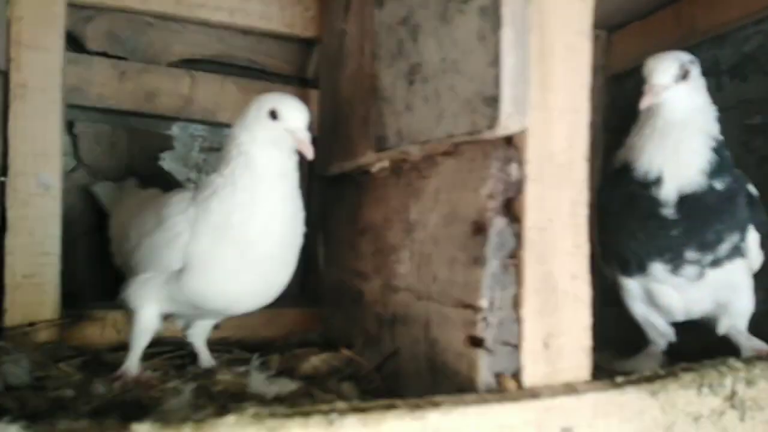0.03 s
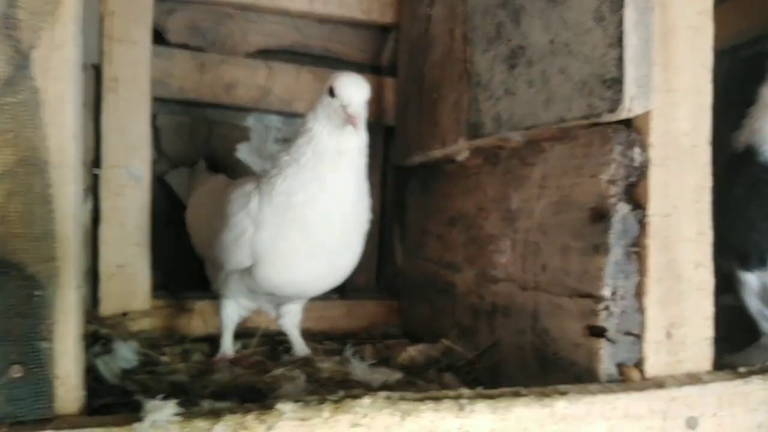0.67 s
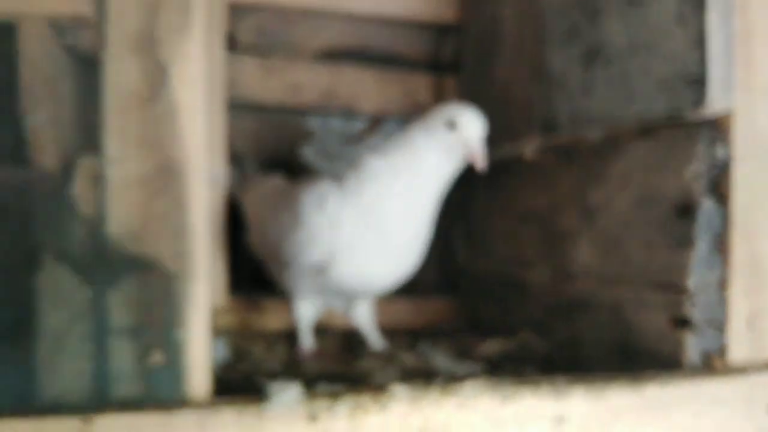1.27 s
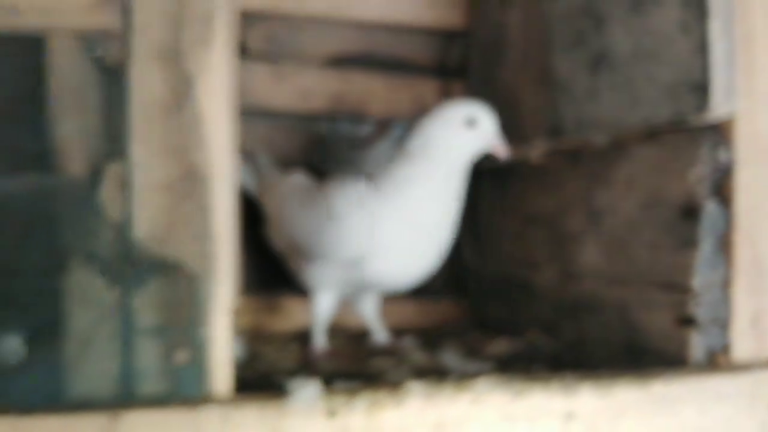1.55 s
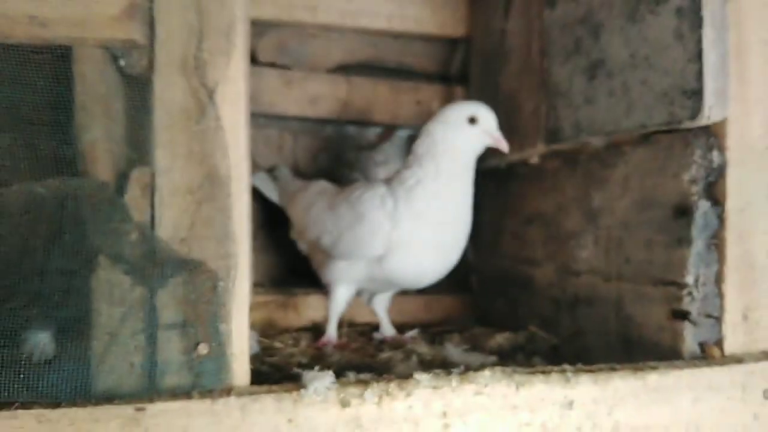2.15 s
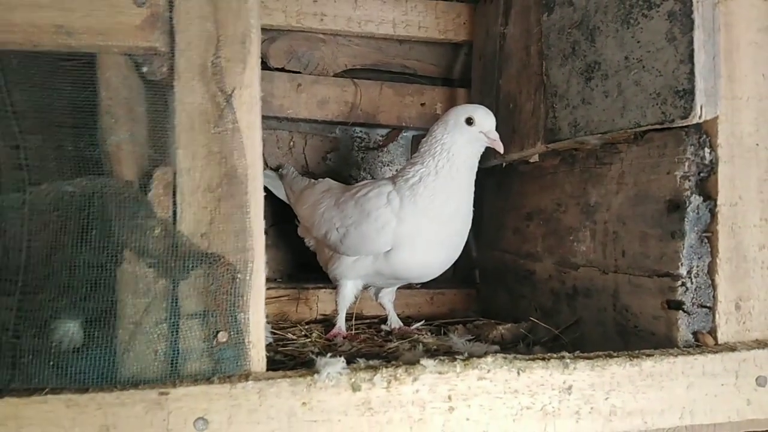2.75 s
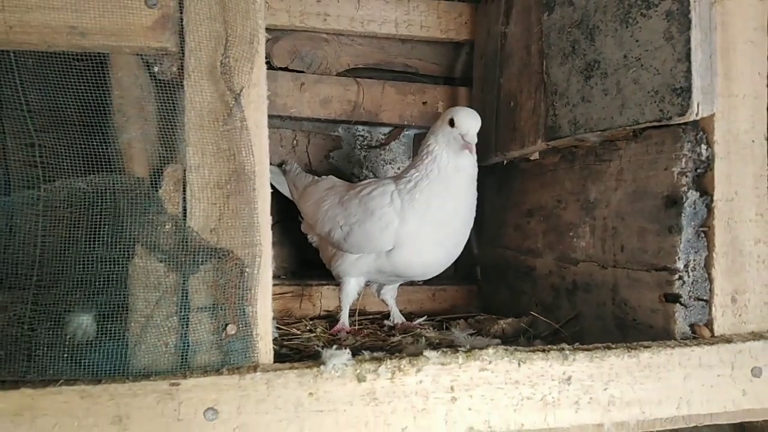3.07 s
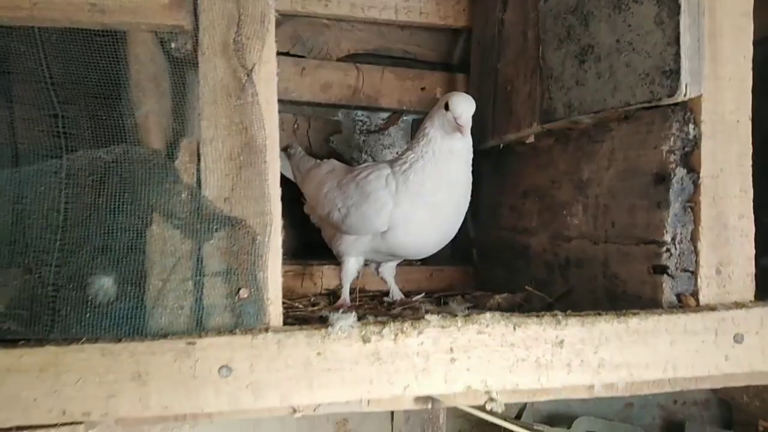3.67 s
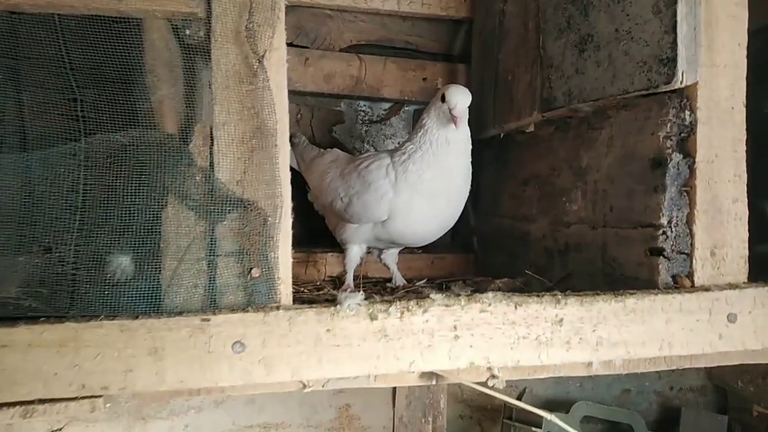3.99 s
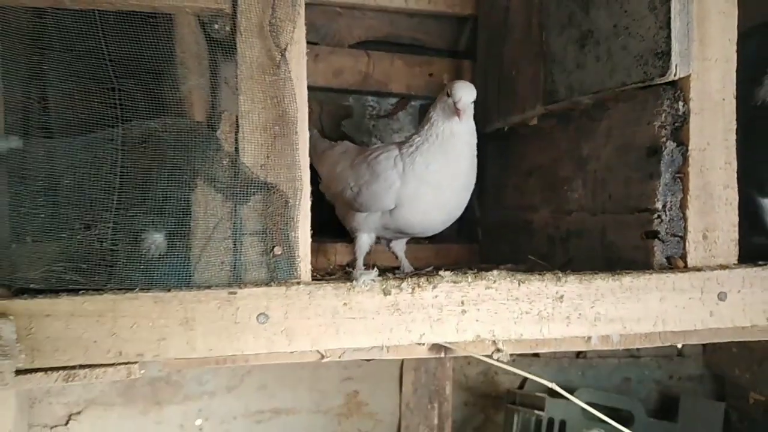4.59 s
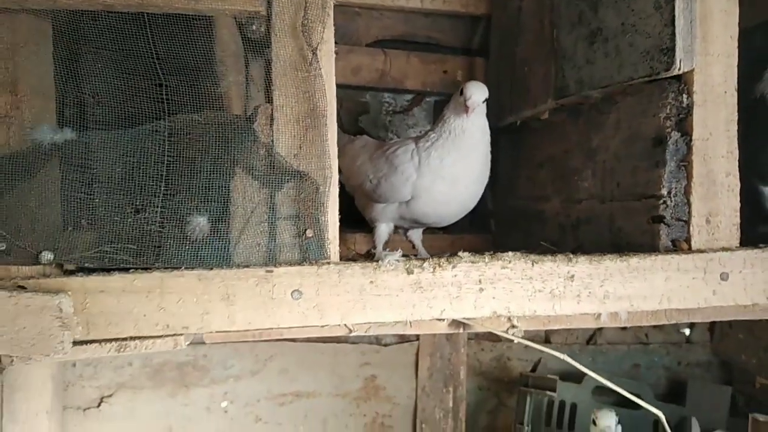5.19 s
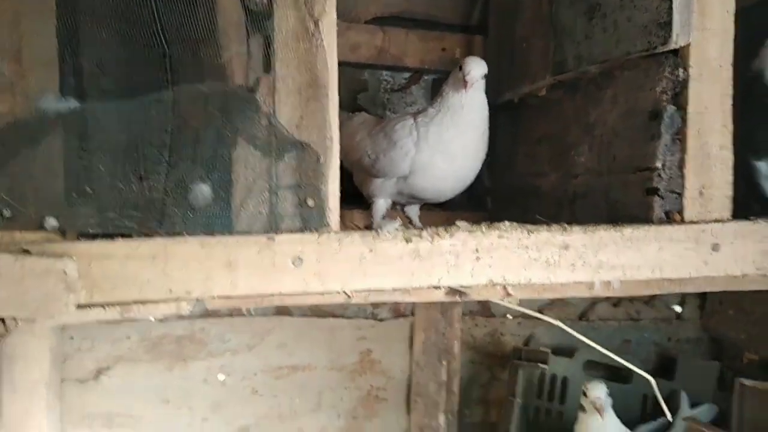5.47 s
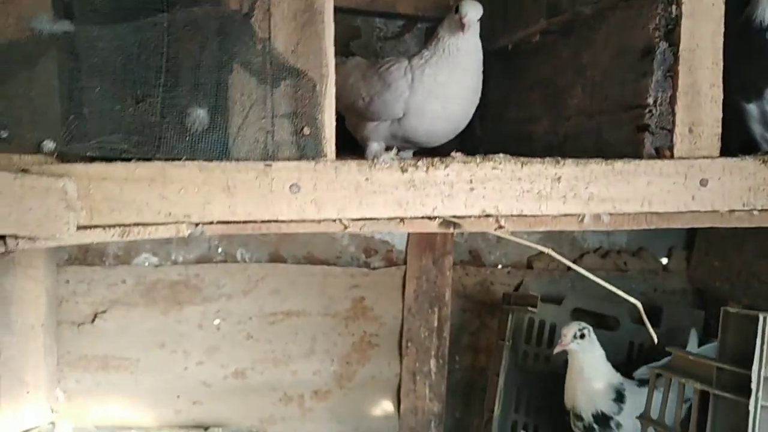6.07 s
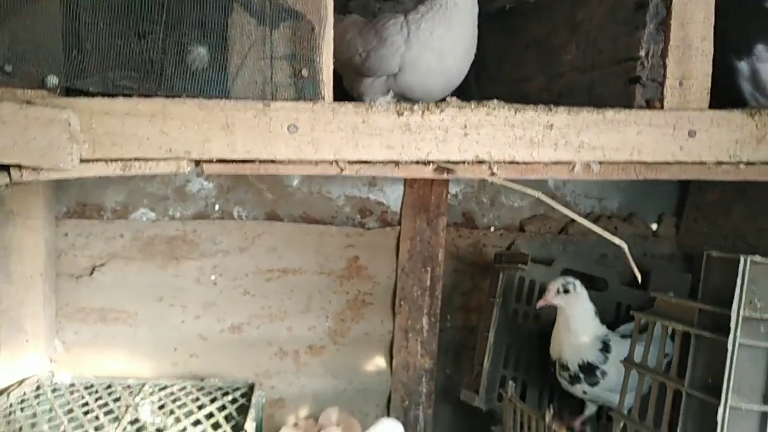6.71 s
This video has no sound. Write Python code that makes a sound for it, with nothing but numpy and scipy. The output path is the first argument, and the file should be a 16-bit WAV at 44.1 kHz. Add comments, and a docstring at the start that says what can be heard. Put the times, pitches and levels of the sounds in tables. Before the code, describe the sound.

Dry straw crunches and feathers rustle as pigeons move around nearby in a wooden loft. Soft knocks, scuffs and a low rumble come from the boards, mixed with sharp little clicks of breaking stalks. After a busy opening there is a brief lull, then one clearer knock and scattered shuffling. The sound is close and boxy, brighter on the left, over a faint steady hiss.

```python
"""Dry litter and feathers rustle over scuffing, rumbling boards: pigeons shuffle in wooden nest boxes.
They are close by and never call, and a faint hiss lies under everything. Soft blows set the boards
ringing, feet crunch the litter, and stalks snap as they break or squeak as they stick and slip.
The rubbing sounds are made of countless tiny slips. The small boxes add a very short echo to the
knocks and snaps, and the treble is stronger on the left."""
import sys
import numpy as np
from scipy import signal
from scipy.fft import rfft, irfft, next_fast_len
from scipy.io import wavfile
from scipy.ndimage import uniform_filter1d

SR = 44100
rng = np.random.default_rng(int(sys.argv[2]) if len(sys.argv) > 2 else 0)


def wav_record(signal):
    """Record a signal, one row per channel, as 16-bit PCM in the file named by sys.argv[1]."""
    frames = np.transpose(np.atleast_2d(signal))
    bounded = np.clip(frames, -1, 1)
    # unit amplitude maps onto the largest positive 16-bit level
    quanta = np.round(bounded * 32767).astype(np.int16)
    wavfile.write(sys.argv[1], SR, quanta)


N = 301933
TIME = np.arange(N) / SR
FFT_SIZE = next_fast_len(N + SR // 2)
FREQS = np.arange(FFT_SIZE // 2 + 1) * SR / FFT_SIZE


def from_db(db):
    """Turn decibels into a number to multiply by."""
    return 10 ** (np.asarray(db) / 20)


def rms_one(x):
    """Scale a signal so that its average power is 1."""
    return x / np.sqrt(np.mean(x ** 2) + 1e-20)


def over_hz(points):
    """Join a table's points into a curve over all frequencies."""
    hz, value = np.transpose(points)
    return np.interp(np.log(np.maximum(FREQS, 1)), np.log(hz), value)


def colour(x, spectrum):
    """Give a sound a tone colour, with a filter that never rings ahead of it (minimum phase)."""
    cepstrum = irfft(np.log(from_db(over_hz(spectrum))), FFT_SIZE)
    cepstrum[1:FFT_SIZE // 2] *= 2
    cepstrum[FFT_SIZE // 2 + 1:] = 0
    return irfft(rfft(x, FFT_SIZE) * np.exp(rfft(cepstrum)), FFT_SIZE)[..., :N]


def linger(power, lag_s):
    """Make a strength build up and die away a little late."""
    keep = np.exp(-1 / (lag_s * SR))
    return signal.lfilter([1 - keep], [1, -keep], power + 1e-18)


def at_mics(pair):
    """Long waves reach both microphones alike; short ones arrive unrelated."""
    # Each row: frequency in Hz, how alike left and right are (1 means the same).
    likeness = [(100, .98), (300, .88), (600, .62), (1000, .05), (1500, -.25), (3000, -.1), (6000, 0)]
    alike = np.clip(over_hz(likeness), -.99, .99)
    first, second = rfft(pair, FFT_SIZE)
    mid, side = np.sqrt(1 + alike) * first, np.sqrt(1 - alike) * second
    return irfft([mid + side, mid - side], FFT_SIZE)[:, :N]


def drift(rate_hz):
    """A smooth random wander, mostly slower than the given rate."""
    slow = irfft(rfft(rng.standard_normal(FFT_SIZE)) / (1 + (FREQS / rate_hz) ** 2), FFT_SIZE)
    return rms_one(slow[:N])


def patches(shape, bins, frames):
    """Smooth random patches, some bins wide in pitch and some frames long in time."""
    field = uniform_filter1d(rng.standard_normal(shape), bins, axis=0)
    return rms_one(uniform_filter1d(field, frames, axis=1))


def shifting_colour(x, ring_db, tint_db):
    """New stalks and feathers keep taking over, each with its own narrow rings and broad tint."""
    spectra = signal.stft(x, nperseg=512)[2]
    rings = patches(spectra.shape[1:], bins=2, frames=9)
    tint = patches(spectra.shape[1:], bins=16, frames=4)
    return signal.istft(spectra * from_db(ring_db * rings + tint_db * tint))[1][:, :N]


def friction(spectrum, slips_per_s, uneven_db, clump_db, clump_hz, smooth, ring_db, tint_db):
    """Rubbing: countless tiny slips of uneven size come in clumps over a smooth hiss."""
    slipping = rng.random(N) < slips_per_s / SR
    sizes = from_db(uneven_db * np.minimum(rng.exponential(1, N), 4))
    clumps = from_db(clump_db * np.clip(drift(clump_hz), -2, 2))
    force = np.sqrt(rms_one(slipping * sizes) ** 2 + smooth ** 2) * clumps
    slips = shifting_colour(force * rng.standard_normal((2, N)), ring_db, tint_db)
    sound = colour(at_mics(slips), spectrum)
    return sound / np.std(sound.mean(axis=0))


def strokes(rows, skew):
    """Movements swell and fade, peaking early if skew is under 1; one power curve per level column."""
    power = np.zeros((len(rows[0]) - 2, N))
    for start, length, *levels in rows:
        during = (TIME > start) & (TIME < start + length)
        arch = np.sin(np.pi * ((TIME[during] - start) / length) ** skew)
        power[:, during] += np.outer(from_db(levels), arch) ** 2
    return power


def stirring_db(times):
    """How much the birds stir at the given times."""
    # The faint, unbroken rustle. Each row: time in seconds, level in dB.
    stir = [(0, -41.5), (0.5, -47), (1.15, -45), (1.6, -49.5), (1.81, -54.5), (2.0, -47), (2.22, -57.5),
            (2.39, -64), (2.66, -68), (2.84, -52), (3.05, -48.5), (3.6, -48), (4.12, -51), (4.7, -46.5),
            (5.06, -52), (5.39, -56.5), (5.62, -46), (6.17, -54.5), (6.85, -53)]
    return np.interp(times, *np.transpose(stir))


def rustles():
    """A bird shifts its body and its feathers brush the litter, with crisp grains on top."""
    # Each row: start in seconds, length in seconds, level in dB.
    body_shifts = [(0.07, 0.12, -36), (0.197, 0.11, -32), (0.31, 0.18, -34.5), (0.645, 0.4, -36),
                   (1.19, 0.12, -44.5), (1.395, 0.12, -38.5), (1.87, 0.068, -46.5), (2.97, 0.19, -43),
                   (3.15, 0.21, -38.5), (3.49, 0.2, -44.5), (3.86, 0.11, -45.5), (4.15, 0.06, -50),
                   (4.36, 0.35, -39.5), (4.785, 0.25, -41), (5.13, 0.11, -45), (5.84, 0.065, -40.5),
                   (6.07, 0.066, -41.5), (6.28, 0.11, -46.5), (6.69, 0.29, -55)]
    # Tone colours of the rustle and the grains. Each row: frequency in Hz, relative level in dB.
    rustle_tone = [(300, -45), (1000, -15.5), (1800, -14), (2500, -9.5), (3700, -14), (5000, -9),
                   (6300, -3.5), (7400, 0.5), (8400, -4.5), (9500, -8.5), (11000, -15), (12600, -19.5),
                   (14500, -27.5)]
    grain_tone = [(500, -34), (2500, -27), (4000, -15.5), (6300, -2), (7400, 0.5), (9500, -7.5),
                  (11500, -16.5), (14500, -24)]
    brushing, = strokes(body_shifts, skew=0.57)
    rustle_gain = np.sqrt(brushing + from_db(stirring_db(TIME)) ** 2)
    grain_gain = from_db(-3.5) * np.sqrt(brushing)
    rustle = friction(rustle_tone, slips_per_s=3000, uneven_db=1.5, clump_db=2.0, clump_hz=26,
                      smooth=1.0, ring_db=3.5, tint_db=1.7)
    grains = friction(grain_tone, slips_per_s=1500, uneven_db=3.5, clump_db=2.0, clump_hz=80,
                      smooth=0.54, ring_db=4.5, tint_db=2.5)
    return rustle_gain * rustle + grain_gain * grains


def scuffs():
    """Feet drag over the boards, and the shelf under them rumbles just after."""
    # Each row: start in seconds, length in seconds, scuff level in dB, rumble level in dB.
    drags = [(0, 0.14, -47.5, -51), (0.2, 0.15, -45.5, -42.5), (0.34, 0.22, -54, -40.5),
             (0.66, 0.16, -45.5, -49), (0.82, 0.27, -48.5, -43.5), (1.385, 0.14, -42, -43.5),
             (1.52, 0.073, -50, -46.5), (1.77, 0.21, -52.5, -52), (2.51, 0.15, -76, -59),
             (2.69, 0.12, -54, -65), (3.26, 0.25, -50, -45.5), (3.74, 0.23, -48, -48),
             (3.96, 0.14, -57.5, -51), (4.39, 0.34, -56.5, -56), (4.73, 0.14, -58, -48.5),
             (4.91, 0.1, -60, -53), (5.105, 0.18, -50, -51), (5.838, 0.25, -42.5, -49),
             (6.245, 0.3, -43.5, -45.5), (6.805, 0.19, -46, -52)]
    # Dull shuffling between the drags. Each row: time in seconds, level in dB.
    shuffle = [(0, -51), (0.55, -54), (1.15, -55), (1.6, -58), (1.95, -62.5), (2.25, -68), (2.4, -86),
               (2.66, -88), (2.78, -69), (2.98, -72.5), (3.45, -56.5), (3.65, -68.5), (4.0, -60),
               (4.21, -67.5), (4.65, -56), (5.02, -81), (5.35, -59), (5.65, -70), (6.12, -54),
               (6.85, -59.5)]
    # Tone colours of the boards and the shelf. Each row: frequency in Hz, relative level in dB.
    scuff_tone = [(100, -15.5), (200, -3), (290, -2), (400, -2), (580, -2.5), (800, -7), (1200, -12.5),
                  (2100, -9), (3200, -17), (8000, -39)]
    rumble_tone = [(20, -58), (40, -36), (60, -1.5), (90, 3), (125, 1), (190, -4), (260, -23.5),
                   (500, -34.5), (2000, -35)]
    shuffle_db = np.interp(TIME, *np.transpose(shuffle))
    idle_rumble_db = -56.5 + 0.26 * (shuffle_db - shuffle_db.mean())
    dragging, shaking = strokes(drags, skew=0.59)
    scuff_gain = np.sqrt(dragging + from_db(shuffle_db) ** 2)
    rumble_gain = np.sqrt(linger(shaking, lag_s=0.018) + from_db(idle_rumble_db) ** 2)
    scuff = friction(scuff_tone, slips_per_s=900, uneven_db=2.0, clump_db=2.0, clump_hz=16,
                     smooth=1.0, ring_db=3.5, tint_db=-0.27)
    rumble = friction(rumble_tone, slips_per_s=510, uneven_db=3.5, clump_db=0.0, clump_hz=25,
                      smooth=1.0, ring_db=1.5, tint_db=0.13)
    return scuff_gain * scuff + rumble_gain * rumble


def hiss(level_db):
    """A steady high hiss lies under everything."""
    # Each row: frequency in Hz, relative level in dB.
    hiss_tone = [(300, -40), (1000, -34), (2500, -20.5), (4000, -15.5), (7200, -0.5), (9500, -10),
                 (12000, -19), (14500, -23)]
    noise = colour(at_mics(rng.standard_normal((2, N))), hiss_tone)
    return from_db(level_db) * noise / np.std(noise.mean(axis=0))


def ring(clicks, hz, fade_s):
    """Each click starts a pure tone that falls by 60 dB in fade_s seconds."""
    decay, turn = from_db(-60 / (fade_s * SR)), 2 * np.pi * hz / SR
    return signal.lfilter([0, np.sin(turn)], [1, -2 * decay * np.cos(turn), decay ** 2], clicks + 1e-18)


def knocks(board_db, thump_db, contact_s, spread_db, focus_db):
    """A soft blow rings the board, most near the pitch the struck spot favours, and shakes the shelf."""
    # Each row: time in seconds, relative knock and thump levels in dB, favoured pitch in Hz.
    blows = [(0.108, -30.5, -59, 750), (0.142, -27, -35, 720), (0.294, -30.5, -46, 370),
             (0.361, -33, -43, 496), (0.431, -30.5, -37.5, 414), (0.845, -31, -35, 486),
             (0.898, -37, -40, 590), (1.004, -33.5, -40.5, 604), (1.34, -24.5, -41.5, 710),
             (1.534, -40, -43.5, 510), (1.65, -27, -45, 710), (1.706, -29.5, -44, 583),
             (1.761, -30, -36.5, 654), (1.988, -45.5, -45.5, 446), (2.197, -58, -46, 450),
             (3.101, -48, -39, 520), (3.25, -20, -32, 480), (3.265, -33.5, -38, 965),
             (3.302, -47, -39, 400), (3.396, -41, -38.5, 420), (3.521, -40, -52, 607),
             (3.97, -44, -47, 326), (4.408, -30, -41, 696), (4.61, -40, -56, 437), (5.112, -43.5, -50, 430),
             (5.197, -50, -45, 700), (5.288, -34.5, -51.5, 644), (5.763, -34.5, -57, 836),
             (6.654, -37, -58, 690)]
    # The notes that the board and the whole shelf ring at.
    # Each row: pitch in Hz, relative level in dB, seconds to fade by 60 dB.
    board_notes = [(339, -11.5, 0.12), (391, -4, 0.12), (416, -3, 0.11), (487, -6, 0.072),
                   (535.4, -4, 0.12), (605, -2.5, 0.045), (676, -5, 0.04), (785, -1.5, 0.033),
                   (883, -1, 0.034), (1054, -7.5, 0.082), (1110, -3, 0.051), (1287, -4, 0.089),
                   (1465, 3, 0.09)]
    shelf_notes = [(90.8, -4.5, 0.43), (121, 3, 0.15), (176.7, -4, 0.22), (300, -13, 0.052)]
    starts, knock_db, low_db, spot_hz = np.transpose(blows)
    notes = [(hz, fade_s, knock_db + board_db + db - focus_db * np.log2(hz / spot_hz) ** 2)
             for hz, db, fade_s in board_notes]
    notes += [(hz, fade_s, low_db + thump_db + db) for hz, db, fade_s in shelf_notes]
    wood = np.zeros(N)
    for hz, fade_s, blow_db in notes:
        size, delay, sign = rng.standard_normal((len(starts), 3)).T
        hits = ((starts + contact_s * abs(delay)) * SR).astype(int)
        clicks = np.zeros(N)
        clicks[hits] = np.sign(sign) * from_db(blow_db + spread_db * size)
        wood += ring(clicks, hz, fade_s)
    band = signal.butter(2, [85, 1900], "band", fs=SR, output="sos")
    return signal.sosfilt(band, wood) * np.ones((2, 1))


def nest_box(x, fade_s, echo_db):
    """The near wooden walls add dense echoes that are gone almost at once."""
    t = TIME[:SR // 3]
    echoes = rng.standard_normal((2, len(t))) * from_db(-60 * t / fade_s) * (t > .001)
    echoes /= np.sqrt(np.sum(echoes ** 2, axis=1, keepdims=True))
    return x + from_db(echo_db) * at_mics(signal.fftconvolve(x, echoes, axes=1)[:, :N])


def settling(per_s, rise_s, over_stir_db):
    """Stray stalks settle at random: rows of faint crunches, louder when the birds stir more."""
    draws = rng.random((round(per_s * N / SR), 2)) * [N / SR, 1]
    return [(start, rise_s, *(stirring_db(start) + np.array(over_stir_db) + 10 * np.log10(size + 1e-9)))
            for start, size in draws]


def crunches(sharpness, tail_share, tail_s):
    """Each step crushes the litter, which crackles, splinters and dies away in the box."""
    # Each row: start in seconds, rise time in seconds, then crackle, splinter and wood levels in dB.
    steps = [(0.140, 0.0066, -22.5, -28, -42), (0.29, 0.0073, -25.5, -33.5, -44),
             (0.316, 0.0059, -32, -45, -51), (0.359, 0.0065, -27.5, -33, -59),
             (0.427, 0.0063, -29, -54, -40.5), (0.457, 0.0024, -25, -39, -61),
             (0.551, 0.011, -33, -35, -50.5), (0.597, 0.0043, -39, -39.5, -69),
             (0.678, 0.0081, -23, -33, -43), (0.722, 0.0097, -33.5, -34.5, -41),
             (0.771, 0.0047, -29, -37, -60), (0.842, 0.01, -26.5, -33.5, -36),
             (0.891, 0.01, -23.5, -38, -36), (1.0005, 0.0066, -22, -27, -38.5),
             (1.024, 0.0073, -28, -33, -47), (1.333, 0.0069, -31, -42, -49),
             (1.645, 0.0083, -34, -39.5, -40), (1.7335, 0.004, -29.5, -32, -41.5),
             (1.753, 0.0069, -39.5, -47, -46), (2.093, 0.0031, -44, -54, -71),
             (2.159, 0.0028, -35, -56, -47.5), (2.186, 0.0075, -40, -54, -50.5),
             (2.289, 0.0045, -34, -45.5, -53), (2.521, 0.012, -46, -49, -61.5),
             (2.696, 0.0018, -34.5, -47, -35), (2.718, 0.0094, -35, -44.5, -48.5),
             (2.888, 0.0047, -33, -45, -70), (3.008, 0.012, -37.5, -47, -61),
             (3.113, 0.005, -31.5, -41.5, -51), (3.191, 0.017, -34.5, -50, -48.5),
             (3.397, 0.0041, -41, -51, -52.5), (3.438, 0.012, -34.5, -47, -51),
             (3.682, 0.012, -35.5, -43, -47.5), (4.234, 0.0026, -37, -28.5, -60),
             (4.750, 0.0045, -37, -39.5, -54), (4.903, 0.0048, -35.5, -33, -51.5),
             (5.1985, 0.0028, -33, -53, -43.5), (5.222, 0.0071, -42, -47, -65),
             (5.277, 0.012, -42.5, -53, -48.5), (5.3158, 0.0054, -38, -46, -41),
             (5.423, 0.0039, -33, -43, -45), (5.758, 0.009, -30, -46, -48),
             (5.897, 0.0027, -33.5, -57, -62), (6.044, 0.0082, -29, -53, -44.5),
             (6.369, 0.0057, -29, -37.5, -58), (6.651, 0.0014, -36.5, -57, -33.5)]
    # Tone colours of those three parts. Each row: frequency in Hz, relative level in dB.
    crackle_tone = [(500, -36), (2500, -25.5), (3700, -18.5), (5000, -11), (6300, -3), (7400, -1),
                    (8400, -5.5), (9500, -17), (11000, -33), (14500, -34)]
    splinter_tone = [(6000, -28), (8600, 0.5), (9700, 2.5), (11200, -4.5), (12600, -10.5), (14500, -17)]
    wood_tone = [(150, -9), (450, -3.5), (900, -5), (1600, -2.5), (2700, 3), (3800, -4.5), (6000, -22)]
    strays = settling(per_s=4.5, rise_s=0.0026, over_stir_db=(4, -18, -12.5))
    power = np.zeros((3, N))
    for start, rise, *levels in steps + strays:
        span = slice(int(start * SR), int(start * SR) + SR // 4)
        age = np.maximum(TIME[span] - start, 0) / rise
        swell = (age * np.exp(1 - age)) ** sharpness
        power[:, span] += np.outer(from_db(levels) ** 2, swell)
    crisp, fine, woody = power
    woody = woody + tail_share * linger(woody, tail_s)
    crackle = friction(crackle_tone, slips_per_s=5000, uneven_db=1.0, clump_db=-0.8, clump_hz=73,
                       smooth=0.67, ring_db=5.5, tint_db=1.0)
    splinters = friction(splinter_tone, slips_per_s=1600, uneven_db=4.5, clump_db=-1.5, clump_hz=200,
                         smooth=0.71, ring_db=4.5, tint_db=2.5)
    wood = friction(wood_tone, slips_per_s=3000, uneven_db=1.0, clump_db=-1.0, clump_hz=220,
                    smooth=0.65, ring_db=3.5, tint_db=0.85)
    return np.sqrt(crisp) * crackle + np.sqrt(fine) * splinters + np.sqrt(woody) * wood


def snaps(lag_s, gain_db):
    """A stalk breaks: one sharp click that reaches the right microphone a little later."""
    # Each row: time in seconds, relative level in dB.
    breaks = [(0.2525, -5), (0.4595, -28), (0.554, -15), (0.601, -7), (0.690, -20), (0.7745, -13),
              (1.734, -10), (2.1595, -29), (2.696, -8), (2.893, -13), (3.401, -16), (3.702, -13),
              (4.236, -6.5), (4.905, -13), (5.2, -22), (5.321, -8), (5.764, -16), (6.048, -22),
              (6.3755, -16), (6.652, -7)]
    # Each row: frequency in Hz, boost or cut in dB.
    snap_tone = [(300, -53), (1000, -16), (3000, -15.5), (4500, -18), (6500, 5), (8000, 16.5), (10000, -7),
                 (14500, -42)]
    clicks = np.zeros((2, N))
    for start, db in breaks:
        clicks[0, int(start * SR)] = clicks[1, int((start + lag_s) * SR)] = from_db(db + gain_db)
    return colour(clicks, snap_tone)


def squeaks(waver_hz, gain_db):
    """Smooth stalks stick and slip, making a thin, unsteady note."""
    # Each row: start in seconds, length in seconds, pitch in Hz, relative level in dB.
    rubs = [(0.974, 0.012, 9100, -28), (0.975, 0.013, 11000, -39), (0.998, 0.021, 10900, -30),
            (1.091, 0.024, 8300, -36.5), (1.124, 0.022, 11000, -56), (1.245, 0.04, 10900, -50),
            (1.262, 0.026, 9150, -46), (1.311, 0.027, 11000, -46), (1.697, 0.017, 8100, -49),
            (2.527, 0.054, 8080, -39.5), (3.769, 0.033, 11100, -48), (3.827, 0.034, 9100, -47),
            (5.06, 0.028, 8450, -49), (5.102, 0.031, 8160, -42.5), (5.833, 0.031, 11000, -44.5),
            (5.84, 0.028, 9600, -48), (6.091, 0.032, 8380, -37), (6.351, 0.02, 9500, -42)]
    smoothing = signal.butter(2, waver_hz, fs=SR, output="sos")
    out = np.zeros((2, N))
    for start, length, hz, db in rubs:
        span = slice(int(start * SR), int((start + length) * SR))
        t = TIME[span]
        slips = rng.standard_normal((2, SR // 8))
        waver = signal.sosfilt(smoothing, slips)[:, -len(t):]
        swell = np.sin(np.linspace(0, np.pi, len(t)))
        out[:, span] += from_db(db + gain_db) * swell * rms_one(waver * np.sin(2 * np.pi * hz * t))
    return out


def scene():
    """All the small movements in the nest boxes, added to the hiss."""
    litter = rustles() + scuffs() + crunches(sharpness=2.36, tail_share=0.34, tail_s=0.0078)
    litter += squeaks(waver_hz=320, gain_db=2.0)
    stalks = nest_box(snaps(lag_s=0.00042, gain_db=-1.5), fade_s=0.17, echo_db=-11.0)
    wood = knocks(board_db=-7.0, thump_db=0.5, contact_s=0.002524, spread_db=2.0, focus_db=14.0)
    return litter + stalks + nest_box(wood, fade_s=0.092, echo_db=-10.5) + hiss(level_db=-58.5)


def record(dry):
    """The left microphone hears much more treble; the deepest bass fades and the very top is cut off."""
    # Each row: frequency in Hz, how much louder left is than right in dB.
    balance = [(130, 0.44), (300, 5), (600, 1.9), (1300, 4.1), (2600, 7.7), (4500, 3.4), (6600, 4.3),
               (7600, 13.8), (9000, 12.6), (11000, 9.3), (14000, 9)]
    bass_cut_hz, top_cut_hz = 41, 14450
    lean = from_db(over_hz(balance) / 2)
    mic_gains = np.array([lean, 1 / lean]) / np.sqrt((lean ** 2 + lean ** -2) / 2)
    thinned = signal.sosfilt(signal.butter(2, bass_cut_hz, "high", fs=SR, output="sos"), dry)
    low_pass = 1 / np.sqrt(1 + (FREQS / top_cut_hz) ** 160)
    return irfft(rfft(thinned, FFT_SIZE) * mic_gains * low_pass, FFT_SIZE)[:, :N]


dry = scene()
out = record(dry)
wav_record(out)
```